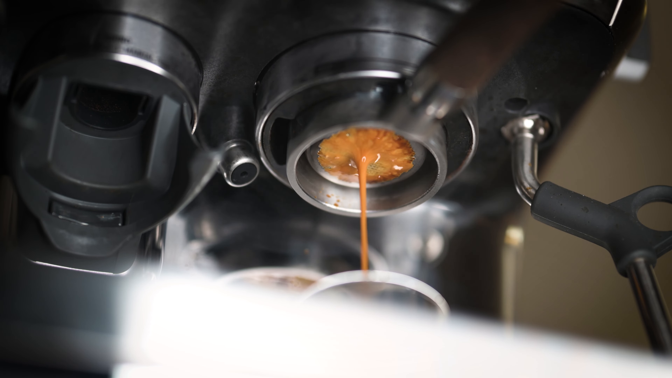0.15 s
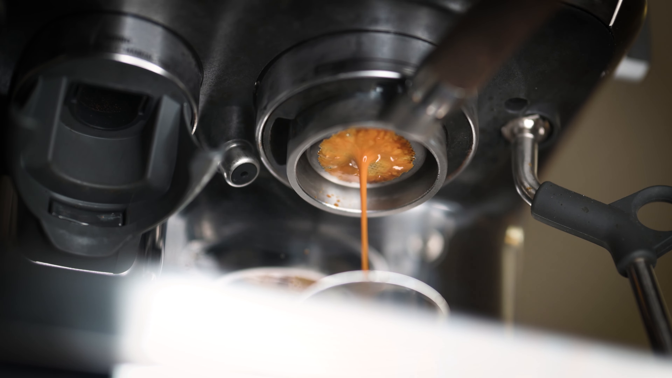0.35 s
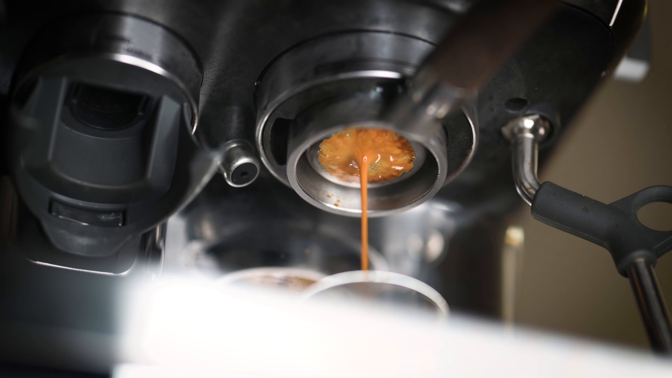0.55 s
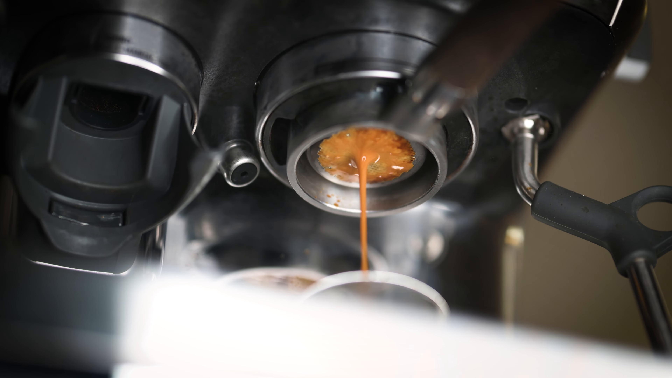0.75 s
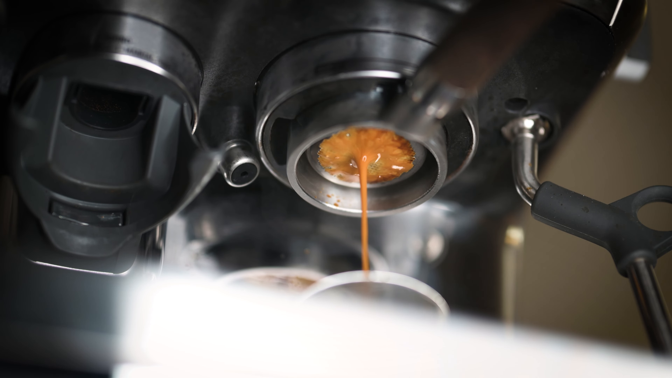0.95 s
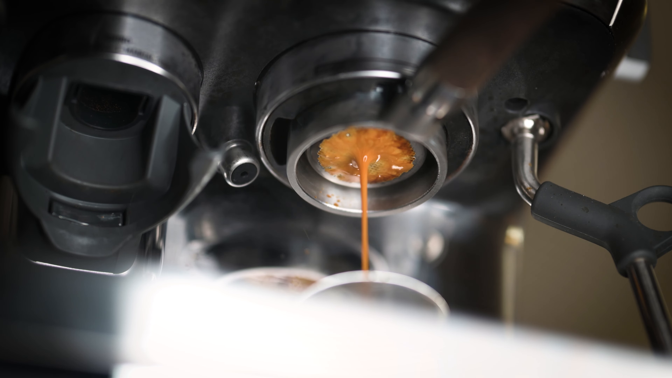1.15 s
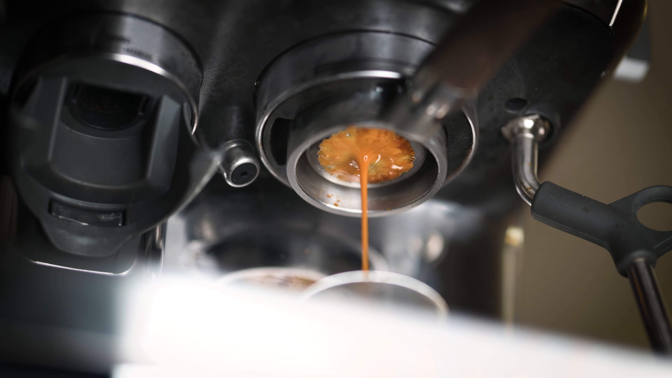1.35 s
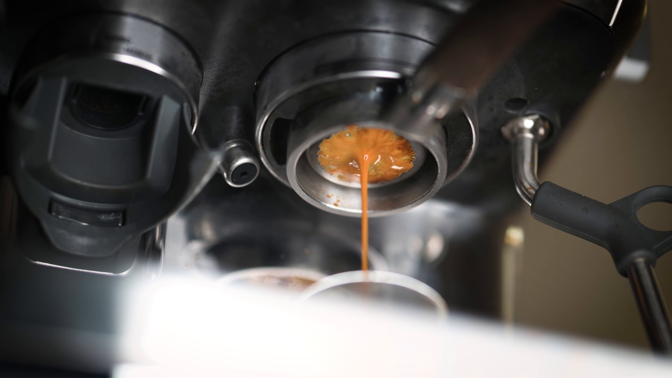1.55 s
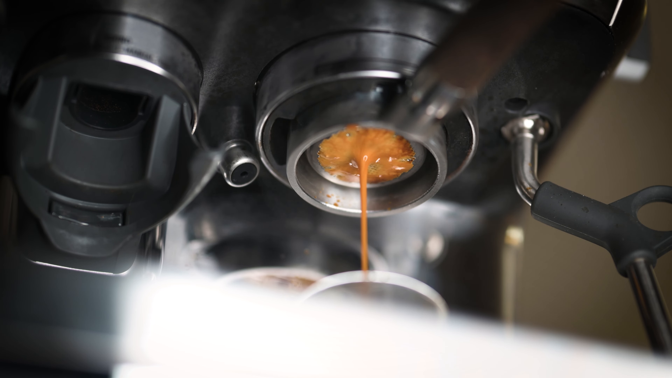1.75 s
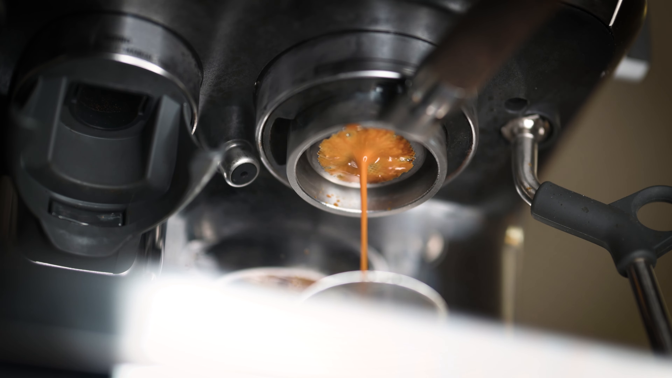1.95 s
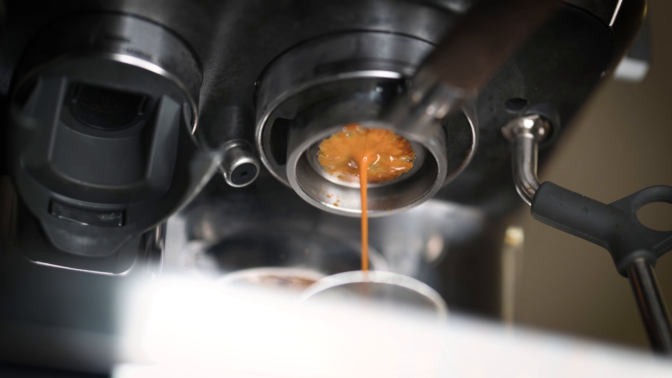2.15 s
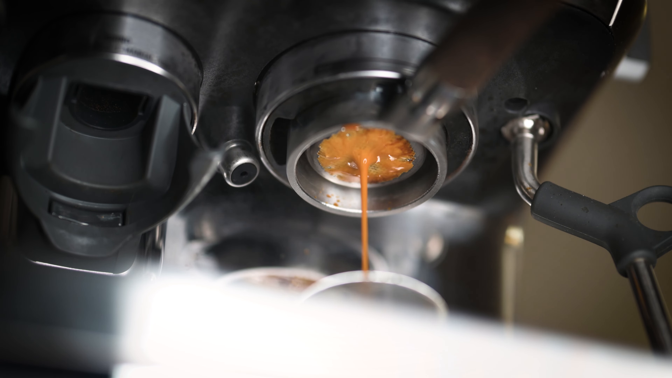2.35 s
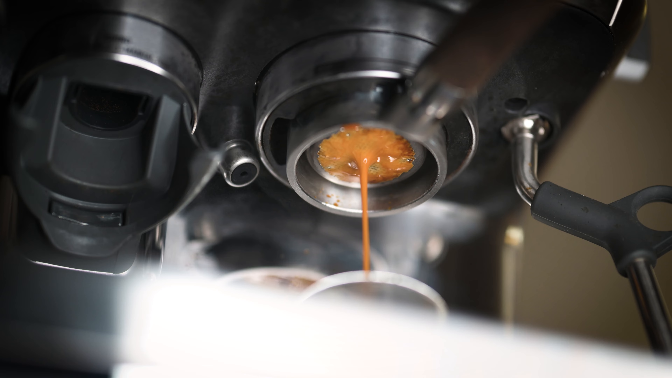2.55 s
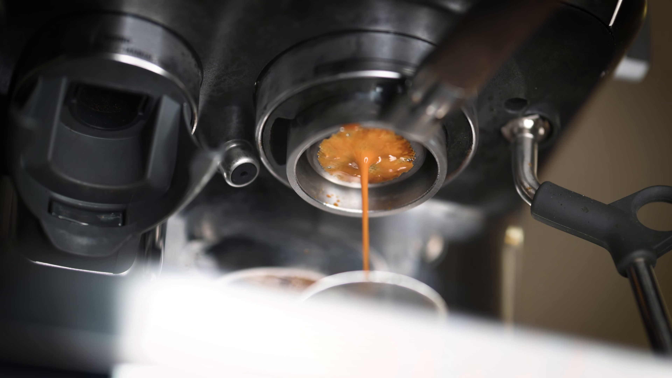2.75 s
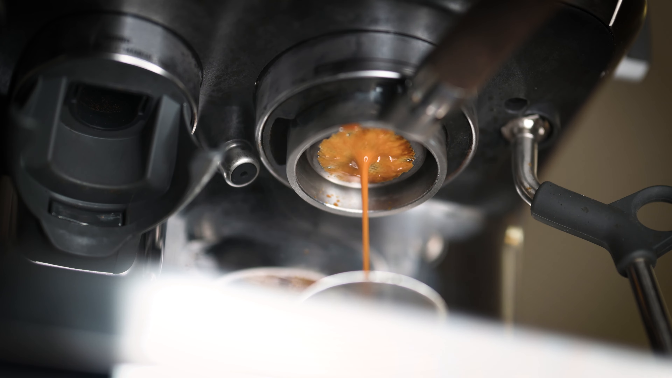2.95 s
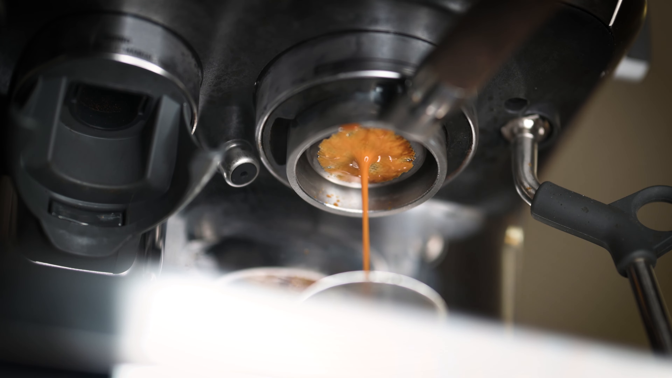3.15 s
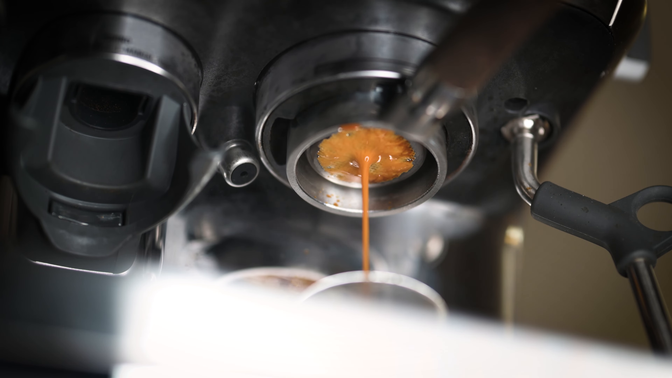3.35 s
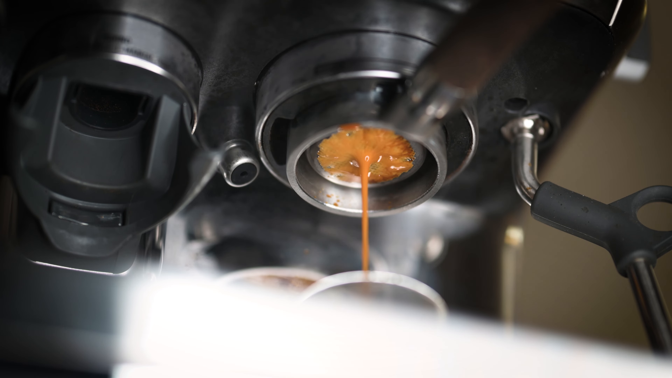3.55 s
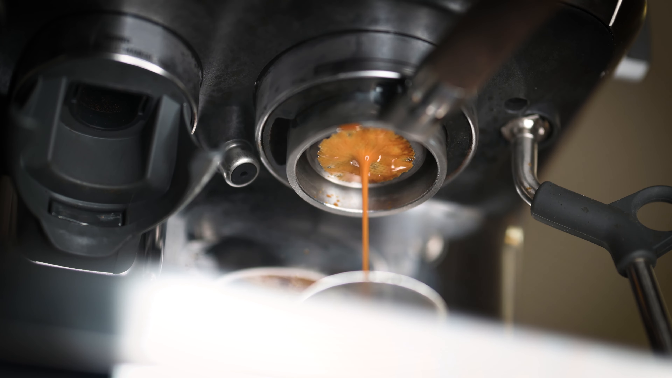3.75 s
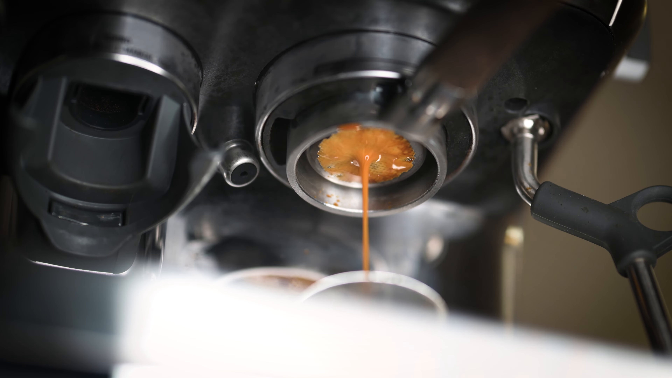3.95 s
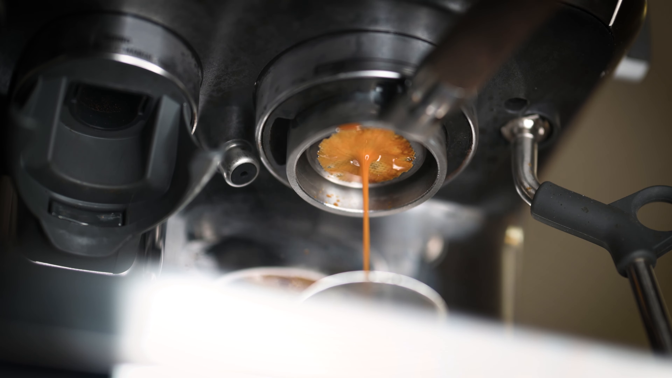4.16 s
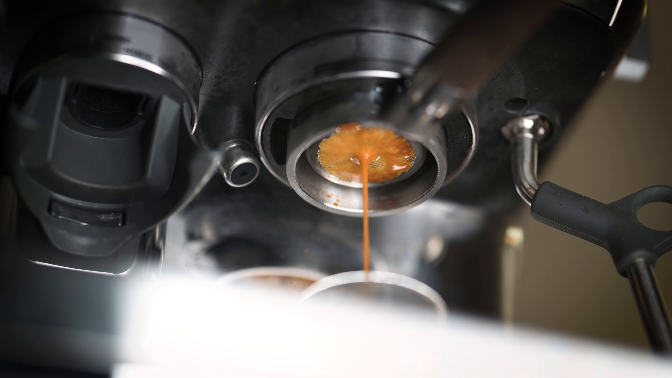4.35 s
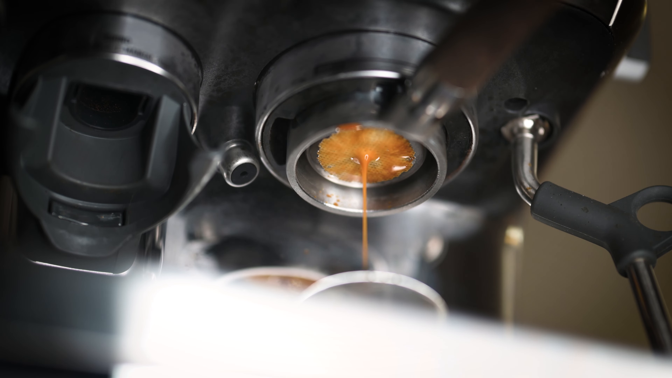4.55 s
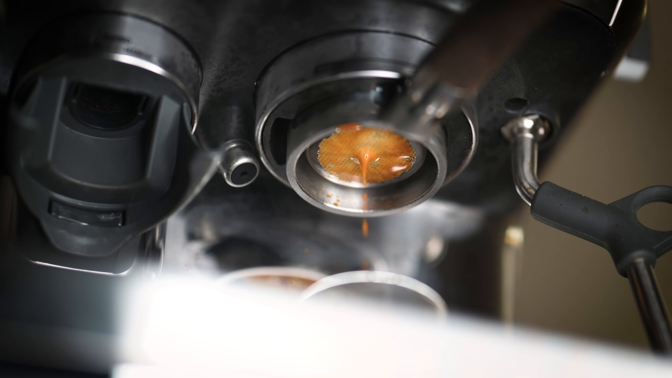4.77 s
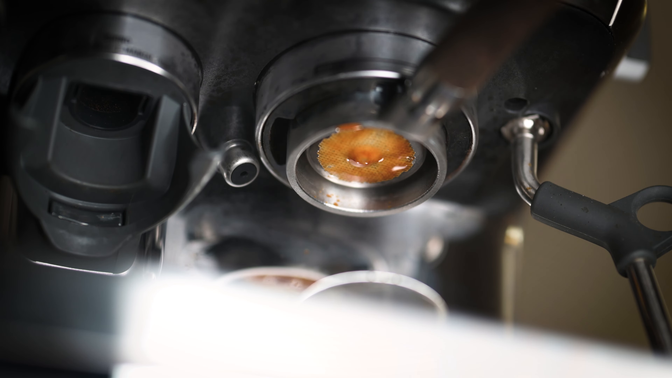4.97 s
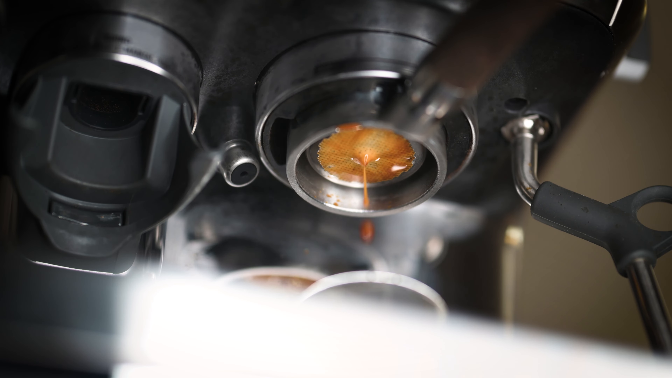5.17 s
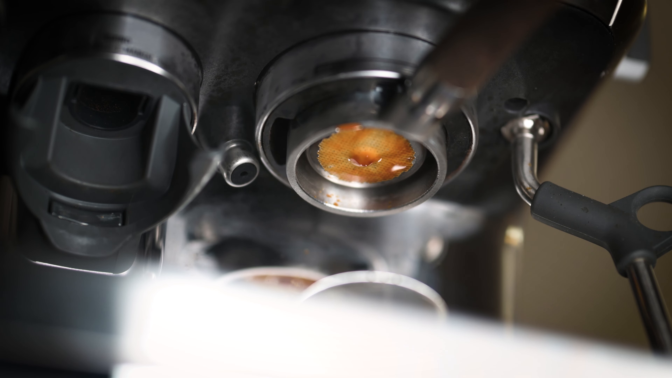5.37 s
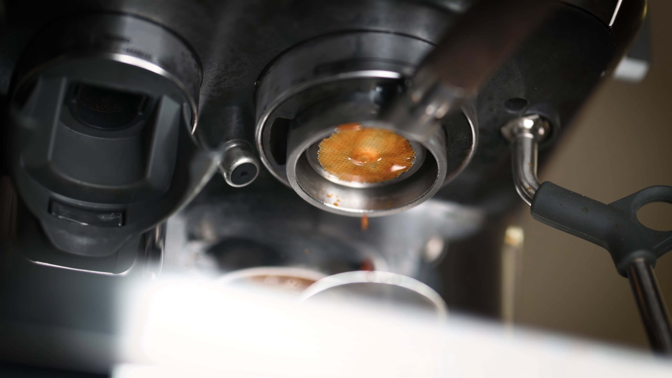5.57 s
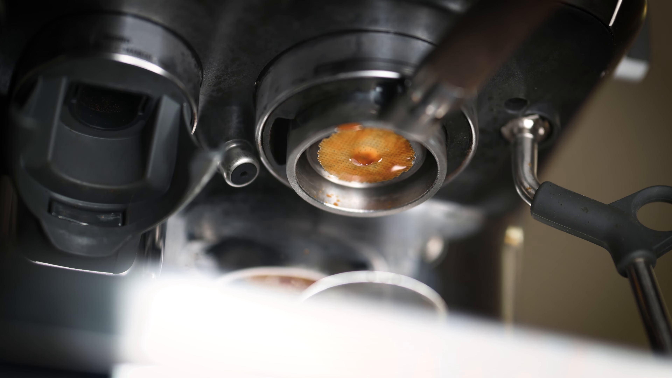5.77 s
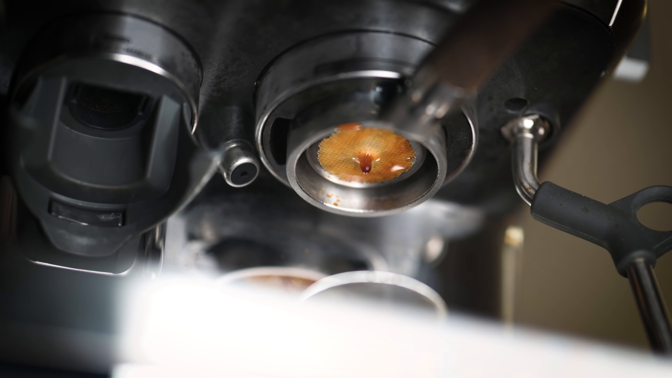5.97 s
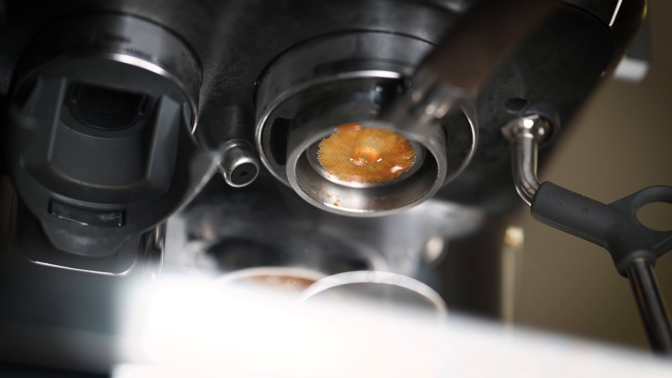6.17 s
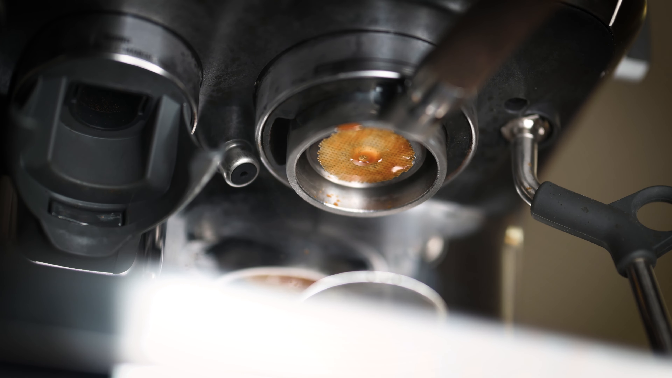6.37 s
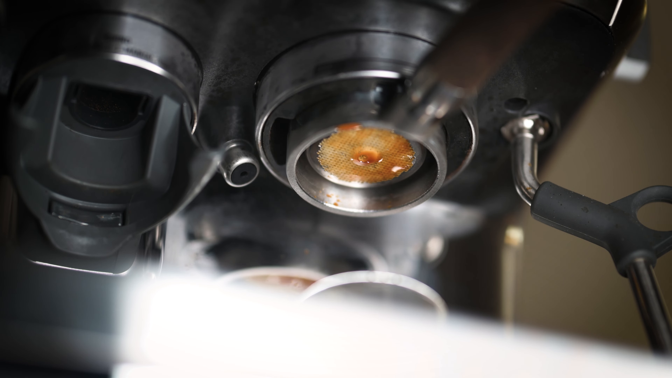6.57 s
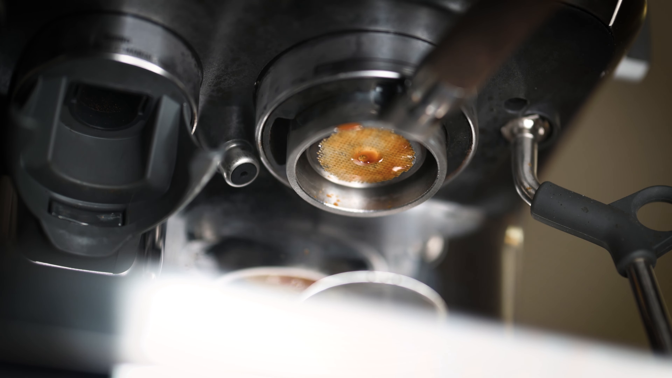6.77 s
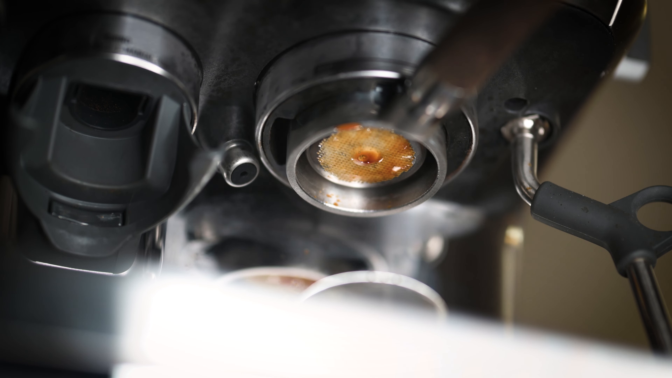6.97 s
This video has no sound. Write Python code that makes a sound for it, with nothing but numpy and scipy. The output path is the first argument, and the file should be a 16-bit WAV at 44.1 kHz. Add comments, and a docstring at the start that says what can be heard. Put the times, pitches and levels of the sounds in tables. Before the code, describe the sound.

An espresso machine pump is already running nearby, a steady electric buzz with a thin casing rattle and a soft hiss of water. Small hollow pops sound irregularly in the hot pipes. At about 2.4 seconds the buzz shifts slightly in tone, and at 3.3 seconds it cuts off with a brief shudder. For the next second the pipes give a quick scatter of light pops and ticks. At about 4.3 seconds comes the loudest sound, a sharp clack and thud as a drawer leaves its catch. It rolls along its runners with a soft rumble, light metal scrapes and little knocks, swelling slightly after 5 seconds, then knocks against its stop at 6.3 seconds. A few faint clicks follow until about 7 seconds. The pops and knocks carry the short reverberation of a small kitchen, and a low electrical hum lies under everything.

```python
"""Espresso machine and drawer

A vibratory pump, driven at the mains frequency, buzzes, rattles its casing and stops. Steam bubbles
collapse in the hot pipework, exciting its modes as pops and ticks over a steady hum. With a sharp clack
a drawer comes off its catch, rolls along its runners and knocks against the stop.
The pops and the drawer reverberate in a small kitchen."""
import sys
import numpy as np
from scipy import signal
from scipy.fft import rfft, irfft, next_fast_len
from scipy.io import wavfile
from scipy.ndimage import uniform_filter1d, map_coordinates

SR = 44100
rng = np.random.default_rng(int(sys.argv[2]) if len(sys.argv) > 2 else 0)


def file_out(sig):
    """Save sig as 16-bit WAV at sys.argv[1]."""
    # one column per channel
    cols = np.atleast_2d(sig).T
    # limit, then scale
    lim = np.clip(cols, -1, 1)
    pcm = np.round(lim * 32767).astype(np.int16)
    wavfile.write(sys.argv[1], SR, pcm)


N = 309582
TIME = np.arange(N) / SR
MAINS_HZ, PUMP_STOP_S = 59.99, 3.283
MID_ONLY = [[1], [0]]  # signals have two rows: mid and side


def amp(db):
    """Amplitude ratio of a level in decibels."""
    return 10 ** (np.asarray(db) / 20)


def unit(x):
    """Normalisation to rms 1."""
    return x / np.sqrt(np.mean(x ** 2) + 1e-20)


def along(points, hz):
    """Interpolation of (frequency, value) points on a logarithmic frequency axis."""
    frequencies, values = np.transpose(points)
    return np.interp(np.log(hz + 1), np.log(frequencies + 1), values)


def noise():
    """Uncorrelated white noise in mid and side."""
    return rng.standard_normal((2, N))


def wobble(rate_hz):
    """Smooth random modulation: a spline through Gaussian values drawn at rate_hz."""
    knots = rng.standard_normal(int(N * rate_hz / SR) + 4)
    return map_coordinates(knots, [TIME * rate_hz])


def filtered(x, response):
    """Linear filtering: the spectrum is multiplied by a frequency response."""
    size = next_fast_len(N + 8192)
    return irfft(rfft(x, size) * response(np.fft.rfftfreq(size, 1 / SR)), size)[..., :N]


def coloured(x, spectrum):
    """Spectral shaping, normalised to rms 1."""
    return unit(filtered(x, lambda hz: amp(along(spectrum, hz))))


def through_body(x, spectrum, size=4096):
    """Convolution with a body's minimum-phase impulse response, of unit energy."""
    level_db = along(spectrum, np.fft.rfftfreq(size, 1 / SR))
    cepstrum = irfft(level_db * np.log(10) / 20)
    cepstrum[1:size // 2] *= 2  # folding the cepstrum makes the response causal
    cepstrum[size // 2 + 1:] = 0
    ring = irfft(np.exp(rfft(cepstrum)))
    return signal.fftconvolve(x, ring[None] / np.linalg.norm(ring), axes=1)[:, :N]


def add(track, start_s, sound):
    """Superposition of a sound on a track."""
    part = track[:, max(round(start_s * SR), 0):][:, :sound.shape[1]]
    part += sound[:, :part.shape[1]]


def burst(t60_s):
    """Exponential decay of noise: a dying chatter of micro-contacts."""
    t = np.arange(SR // 3) / SR
    return rng.standard_normal((2, len(t))) * amp(-60 * t / t60_s)


def contact(t60_s, impulse_share):
    """Impact excitation: energy is divided between one impulse and the chatter after it."""
    chatter = burst(t60_s)
    sound = np.sqrt(1 - impulse_share) * chatter
    sound[0, 0] += np.sqrt(impulse_share) * np.linalg.norm(chatter[0])
    return sound


# Tones of the electrical hum: pitch_hz, rms_level_db
HUM_TONES = [(58.6, -62.5), (119.99, -45), (382, -71.5), (613.7, -73.5), (1712, -76), (7607, -89),
             (10150, -86)]
# Spectrum of the still air: frequency_hz, relative_level_db
AIR_SPECTRUM = [(20, -17), (55, 5.5), (100, -1), (200, -3.5), (380, -6.5), (800, -14), (1700, -16.5),
                (3500, -23.5), (8000, -32.5), (15000, -35)]
def background():
    """Stationary noise floor: mains hum, a narrow-band electronic whistle and broadband air."""
    tones = sum(np.sqrt(2) * amp(db) * np.sin(2 * np.pi * hz * TIME) for hz, db in HUM_TONES)
    whistle = unit(filtered(noise(), lambda hz: 1 / (1 + ((hz - 15200) / 110) ** 2)))
    hum = tones * amp(0.15 * wobble(4)) * MID_ONLY
    return hum + amp(-77) * whistle + amp(-55.5) * coloured(noise(), AIR_SPECTRUM)


# Reverberation time of the kitchen: frequency_hz, t60_s
KITCHEN_DECAY = [(150, 0.1), (600, 0.45), (3000, 0.4), (4500, 0.42), (7000, 0.25), (14000, 0.35)]
def kitchen(x):
    """Diffuse reverberation: each frequency decays exponentially at its own rate."""
    hz, t, bands = signal.stft(rng.standard_normal((2, SR * 2 // 3)), SR, nperseg=256)
    decay = amp(-60 * t / along(KITCHEN_DECAY, hz)[:, None])
    tail = signal.istft(bands * decay, SR, nperseg=256)[1]
    tail = np.pad(tail, ((0, 0), (SR // 200, 0)))  # 5 ms pre-delay
    return signal.fftconvolve(x, tail / np.linalg.norm(tail[0]), axes=1)[:, :N]


# Modes of the pipework: pitch_hz, relative_level_db, t60_s
PIPE_MODES = [(582, -4.5, 0.11), (1190, 5.5, 0.024), (1347, -7, 0.097), (1840, -7, 0.059),
              (2030, -5.5, 0.21), (2152, -4.5, 0.13), (2343, 5.5, 0.021), (2603, -0.5, 0.031)]
def pop(level_db, snap_db, snap_hz):
    """Bubble collapse: a dry snap excites pipe modes, which flutter as echoes run along the pipe."""
    t = np.arange(SR // 6) / SR
    hz, mode_db, t60_s = np.transpose(PIPE_MODES)[:, :, None]
    echo_phasors = rng.standard_normal((2, len(PIPE_MODES), 20, 2)) @ [1, 1j]
    flutter = signal.resample(echo_phasors, len(t), axis=2)
    modes = np.real(flutter * np.exp(2j * np.pi * hz * t))
    ring = np.sum(amp(mode_db - 60 * t / t60_s) * modes, axis=1)
    attack = 1 - np.exp(-t / 0.0005)
    collapse = contact(t60_s=0.017, impulse_share=1 / 5)[:, :len(t)]
    snap = signal.lfilter(*signal.iirpeak(min(snap_hz, SR / 3), Q=0.9, fs=SR), collapse)
    return amp(level_db) * (amp(-15) * ring * attack + amp(snap_db + 5) * snap)


# Distinct bubble collapses: start_s, relative_level_db, snap_emphasis_db
STEAM_POPS = [(0.0243, -24, -19), (0.167, -43, 3), (0.637, -25.5, -19), (0.831, -26, -24),
              (1.1026, -29, -16), (1.3818, -30.5, -20), (1.9644, -32, -21), (2.3478, -35, -7),
              (2.9742, -36, -7), (3.3787, -31.5, -18.5), (3.477, -37.5, -8), (3.5319, -37, -9),
              (3.6026, -37, -10), (3.6388, -32.5, -17), (3.7773, -41, -20), (3.7924, -32, -13),
              (3.8762, -36.5, -17), (3.9384, -39.5, -15.5), (3.977, -33.5, -5.5), (4.0248, -37.5, -6),
              (4.2108, -30.5, -18)]
def pipework(simmer_s=0.8, simmer_count=22):
    """Transients of collapsing steam: distinct pops, and a faint simmer after the pump stops."""
    out = np.zeros((2, N))
    for start_s, level_db, snap_db in STEAM_POPS:
        snap_hz = 3900 * np.exp(0.11 * rng.standard_normal())
        add(out, start_s, pop(level_db, snap_db, snap_hz))
    for k, (jitter, faintness, pitch) in enumerate(rng.random((simmer_count, 3))):
        start_s = PUMP_STOP_S + simmer_s * (k + jitter) / simmer_count
        add(out, start_s, pop(level_db=-38.5 - 4 * faintness, snap_db=-13.5, snap_hz=3000 + 2500 * pitch))
    return out


def wheel_grain(depth_db, size=512):
    """Uneven excitation by the wheels: noise swells briefly, now at one pitch, now at another."""
    bands = signal.stft(noise(), nperseg=size)[2]
    swells = uniform_filter1d(rng.standard_normal(bands.shape[1:]), size=6, axis=0)  # across frequency
    swells = uniform_filter1d(swells, size=5, axis=1)  # across time
    return signal.istft(bands * amp(depth_db * unit(swells)), nperseg=size)[1][:, :N]


# Spectra of the runners under rolling and under friction: frequency_hz, relative_level_db
ROLLING_SPECTRUM = [(100, -34), (170, -18), (243, 0.5), (278, -10), (380, 1), (469, -6.5), (595, -5.5),
                    (1030, -11.5), (1590, -7), (1850, -11), (2980, -12), (3670, -27), (4130, -11.5),
                    (4450, -36), (6000, -53), (7800, -62), (13200, -120)]
FRICTION_SPECTRUM = [(2060, -50), (3500, 1), (5440, -2.5), (7140, -9.5), (7900, -6), (8620, -12),
                     (15800, -22)]
def runners(start_s=4.36, end_s=6.29, edge_s=0.013, pull_s=5.11, pull_rise_s=0.34):
    """Rolling and friction noise: both fade as the drawer coasts; a second pull lifts the rumble."""
    age = TIME - start_s
    moving = np.clip(age / edge_s, 0, 1) * np.clip((end_s - TIME) / edge_s, 0, 1)
    pulled = np.clip((TIME - pull_s) / pull_rise_s, 0, 1)
    rumble_db = -52.5 + 8.5 * pulled - 4 * age - 0.1 * wobble(13)
    hiss_db = -57.5 - 7.5 * age + 3.5 * wobble(22)
    rumble = coloured(wheel_grain(depth_db=3.2) * amp(1.56 * wobble(120)), ROLLING_SPECTRUM)
    hiss = coloured(noise() * amp(3.1 * wobble(200)), FRICTION_SPECTRUM)
    return moving * (amp(rumble_db) * rumble + amp(hiss_db) * hiss)


# Light scrapes of metal: start_s, level_db, t60_s
METAL_SCRAPES = [(4.295, -28, 0.13), (4.326, -39, 0.27), (4.475, -47, 0.068), (4.635, -57, .06),
                 (4.55, -52, 0.1), (4.73, -64, 0.21), (4.8998, -44, 0.065), (5.211, -42.5, 0.046),
                 (5.237, -49, 0.26)]
def scrapes():
    """Sliding friction: short noise bursts filtered by the runners."""
    friction = np.zeros((2, N))
    for start_s, level_db, t60_s in METAL_SCRAPES:
        add(friction, start_s, amp(level_db) * burst(t60_s))
    return through_body(friction, FRICTION_SPECTRUM)


def thud(start_s=4.264, pitch_hz=391, level_db=-13, t60_s=0.061):
    """Damped oscillation: the drawer's front rings, slightly roughly, as it comes free."""
    phase = 2 * np.pi * pitch_hz * TIME + wobble(70) / 2
    envelope = amp(level_db - 60 * TIME / t60_s) * (1 - np.exp(-TIME / 0.0042))
    out = np.zeros((2, N))
    add(out, start_s, envelope * np.sin(phase) * MID_ONLY)
    return out


# Resonances of the hard catch: pitch_hz, bandwidth_hz, relative_level_db
CATCH_MODES = [(1664, 170, -1.5), (2846, 365, -1.5), (4323, 640, -19), (6000, 350, -18.5), (7000, 620, -31),
               (9300, 1800, -26.5), (13900, 6100, -28)]
def catch_response(hz):
    """Modal superposition: the catch responds as a sum of second-order resonators."""
    return sum(amp(db) * 1j * hz * width / (centre ** 2 - hz ** 2 + 1j * hz * width)
               for centre, width, db in CATCH_MODES)


# Impacts of the drawer: start_s, crack_drive_db, knock_drive_db, t60_s
DRAWER_IMPACTS = [(4.2547, -11, -23.5, 0.028), (4.257, -28, -23.5, 0.056), (4.2765, -47, -19.5, 0.052),
                  (4.2894, -25, -28.5, 0.14), (4.4587, -42, -43, 0.16), (4.5379, -46, -43, 0.36),
                  (4.62, -36.5, -52, 0.044), (4.8, -47, -44.5, 0.07), (5.376, -66, -45, 0.14),
                  (5.6935, -44.5, -56, 0.13), (5.733, -48, -45, 0.08), (6.2743, -31.5, -26, 0.046),
                  (6.323, -51, -42, 0.23), (6.68, -61, -60.5, .1), (6.755, -53, -55, 0.03),
                  (6.8132, -55, -53, 0.029), (6.9868, -57, -59, .04)]
# Response of its dull body: frequency_hz, relative_level_db
BODY_SPECTRUM = [(70, -78), (130, -2), (230, 1), (350, 5), (470, 4.5), (620, 8.5), (820, -9.5), (1130, 2.5),
                 (1380, 1.5), (1600, -5), (1950, 5), (2750, -23.5), (3800, -3), (5000, -59), (15000, -34)]
def drawer():
    """Impact and resonance: cracks of the catch and knocks of the body, amid scraping and rolling."""
    cracks, knocks = np.zeros((2, 2, N))
    for start_s, crack_db, knock_db, t60_s in DRAWER_IMPACTS:
        cutoff_hz = min(3600 * amp(2 * max(crack_db + 26, 0)), SR / 2.5)  # harder blows are brighter
        crack = signal.lfilter(*signal.butter(2, cutoff_hz, fs=SR), contact(t60_s, impulse_share=1 / 8))
        add(cracks, start_s, amp(crack_db) * crack)
        add(knocks, start_s, amp(knock_db) * contact(t60_s, impulse_share=1 / 6))
    catch = amp(16) * filtered(cracks, catch_response)
    return catch + through_body(knocks, BODY_SPECTRUM) + scrapes() + runners() + thud()


# Air passing the valve: centre_s, half_width_s, flow_change_db, panel_change_db
AIR_SURGES = [(0.294, 0.026, 2.5, -2), (0.542, 0.048, 1, -1.8), (0.634, 0.045, 5, 2), (0.71, 0.037, 0, -2),
              (2.447, 0.12, 2.5, 0)]
def surges():
    """Load modulation: passing air gives the flow noise and panel drone Gaussian bumps in level."""
    centre_s, half_width_s, flow_db, panel_db = np.transpose(AIR_SURGES)
    bumps = np.exp(-((TIME[:, None] - centre_s) / half_width_s) ** 2)
    return bumps @ flow_db, bumps @ panel_db


# Spectra of the rushing water and of the final shudder: frequency_hz, relative_level_db
FLOW_SPECTRUM = [(120, -12), (250, -3.5), (620, 11), (850, -7), (1200, 2), (1550, -9.5), (2150, -2.5),
                 (3200, -9.5), (8000, -23.5)]
SHUDDER_SPECTRUM = [(100, -11), (260, -6), (620, -3), (850, -18), (1150, -8), (3000, -37.5)]
def water(running, surge_db):
    """Flow noise of water forced through the valve, and a decaying shudder when the piston stops."""
    flow = amp(-46.5 + surge_db + 1.4 * wobble(9)) * running * coloured(noise(), FLOW_SPECTRUM)
    shudder = np.zeros((2, N))
    add(shudder, PUMP_STOP_S, amp(-41) * burst(t60_s=0.64))
    return flow + through_body(shudder, SHUDDER_SPECTRUM)


def stroke_envelope(strike_s, rise_s, fall_s, floor):
    """Periodic amplitude modulation: a swell follows every piston stroke, at rms 1."""
    age = (TIME - strike_s) % (1 / MAINS_HZ)
    return unit(floor + (1 - np.exp(-age / rise_s)) * np.exp(-age / fall_s))


# Spectrum of the spray: frequency_hz, relative_level_db
SPRAY_SPECTRUM = [(2500, -33), (6000, 6), (9800, 6), (12500, 1), (15200, -7)]
def valve_spray():
    """Pulsating flow: each stroke sends a hissing spurt through the valve."""
    spurts = stroke_envelope(strike_s=0.002, rise_s=0.00081, fall_s=0.0056, floor=0.076)
    return amp(1.5 * wobble(7.6)) * spurts * coloured(noise(), SPRAY_SPECTRUM)


# Spectrum of the rattling casing: frequency_hz, relative_level_db
RATTLE_SPECTRUM = [(850, 0.5), (1450, 3), (1520, -1), (1680, -6), (1850, -3.5), (2100, -7), (2350, -4.5),
                   (2650, 2.5), (3200, -15), (3850, -6.5), (4150, -8.5), (4450, -1.5), (4950, -8),
                   (5500, -5.5), (5900, -8), (7700, -34.5), (9400, -15.5), (14000, -31)]
def casing_rattle(drift=0.45, looseness=0.38):
    """Quasi-periodic contact: nearly the same chatter recurs each cycle, its pattern slowly drifting."""
    period = round(SR / MAINS_HZ)
    blend_a, blend_b = drift * wobble(1.28), drift * wobble(1.54)
    base, cycle_a, cycle_b = np.tile(rng.standard_normal((3, 2, period)), N // period + 1)[..., :N]
    pattern = (base + blend_a * cycle_a + blend_b * cycle_b) / np.sqrt(1 + blend_a ** 2 + blend_b ** 2)
    chatter = pattern + looseness * noise()
    strokes = stroke_envelope(strike_s=0.001, rise_s=0.001, fall_s=0.0013, floor=0.11)
    return coloured(chatter * strokes * amp(0.67 * wobble(40.4)), RATTLE_SPECTRUM)


# Thin metal parts, before and after the casing shifts on its seat: nominal_pitch_hz, rms_level_db
RING_BEFORE_SHIFT = [(1437, -62.5), (1680, -59), (2099, -58.5), (2579, -58), (3838, -79.5), (4500, -102),
                     (4920, -61)]
RING_AFTER_SHIFT = [(1319, -60), (1680, -65), (2099, -62.5), (2579, -62), (2880, -77), (3779, -64.5),
                    (4500, -74), (4920, -64), (5879, -71)]
def casing_ring(shifted):
    """Forced vibration: each thin metal part rings at the nearest harmonic of the stroke."""
    out = np.zeros((2, N))
    for tones, weight, waver_db in (RING_BEFORE_SHIFT, 1 - shifted, 0), (RING_AFTER_SHIFT, shifted, 4):
        for nominal_hz, level_db in tones:
            harmonic_hz = round(nominal_hz / MAINS_HZ) * MAINS_HZ
            phase = 2 * np.pi * (harmonic_hz * TIME + rng.random((2, 1)))
            out += weight * np.sqrt(2) * amp(level_db + waver_db * wobble(2.85)) * np.sin(phase)
    return out


# Harmonics of the piston stroke: harmonic_number, relative_level_db
STROKE_HARMONICS = [(1, -8.5), (2, -8.5), (3, -16.5), (4, -4.5), (5, -4), (6, -11.5), (7, -0.5), (8, -7),
                    (9, -13), (10, 4.5), (11, 4), (12, -15.5), (13, -15.5), (14, -13.5), (15, -29),
                    (16, -11.5), (17, -29.5), (18, -37), (19, -5.5), (20, -14), (21, -24), (22, -42),
                    (23, -57), (24, -30)]
def piston_drone(part_gains, waver_db=0.38, scatter_turns=0.04, side_db=-8):
    """Harmonic series of a periodic force: piston, frame, panel and tray each radiate their own range."""
    number, level_db = np.transpose(STROKE_HARMONICS)
    size = amp(level_db)
    # dispersion: the frame passes higher harmonics later, spreading each stroke over its whole cycle
    lag = np.cumsum(size ** 2) / np.sum(size ** 2)
    scatter = scatter_turns * rng.standard_normal((2, len(number))) * [[1], [10]]  # tenfold in the side
    turns = lag - np.cumsum(lag) + scatter
    radiator = np.digitize(number, [1.5, 8.5, 13.5])
    out = np.zeros((2, N))
    for part, gain in enumerate(part_gains):
        own = np.flatnonzero((radiator == part) & (number != 2))  # the hum supplies harmonic 2
        for i in own:
            tone = np.sqrt(2) * np.cos(2 * np.pi * (number[i] * MAINS_HZ * TIME + turns[:, i, None]))
            share = size[i] / np.linalg.norm(size[own])
            out += gain * share * amp(waver_db * wobble(7.52)) * tone
    return out * amp([[0], [side_db]])


def part_gain(shifted, start_db, drift_db_per_s, shifted_db, t60_s):
    """Drive and free decay: a level drifts as pressure builds, holds after the shift, then dies away."""
    building_db = start_db + drift_db_per_s * TIME
    running_db = building_db + shifted * (shifted_db - building_db)
    return amp(running_db - 60 * np.maximum(TIME - PUMP_STOP_S, 0) / t60_s)


# Gains of piston, frame, panel, tray, rattle and spray: start_db, drift_db_per_s, shifted_db, t60_s
PUMP_PARTS = [(-47, -0.5, -46.5, 0.25), (-32.5, -1.02, -33, 0.28), (-29.5, -2.5, -33, 0.071),
              (-45, 0.75, -43, 0.27), (-49.5, 0.37, -49, 0.068), (-59.5, -1, -59, 0.1)]
def pump(shift_s=2.38, shift_takes_s=0.084):
    """Forced vibration at the mains frequency; the timbre changes as the casing shifts on its seat."""
    shifted = np.clip((TIME - shift_s) / shift_takes_s, 0, 1)
    piston, frame, panel, tray, shaking, spraying = [part_gain(shifted, *part) for part in PUMP_PARTS]
    running = frame / frame.max()
    flow_surge_db, panel_surge_db = surges()
    coil_hz = HUM_TONES[1][0]  # twice the mains frequency
    coil = amp(-46.5) * running * np.sin(2 * np.pi * coil_hz * TIME) * MID_ONLY
    rattle = amp(4) * shaking * casing_rattle()
    spray = spraying * valve_spray()
    ring = running * casing_ring(shifted)
    drone = piston_drone([piston, frame, panel * amp(panel_surge_db), tray])
    return coil + drone + water(running, flow_surge_db) + rattle + spray + ring


# Stereo width: frequency_hz, side_gain_db
STEREO_WIDTH = [(100, -17), (500, -13), (1100, -10), (2200, -7), (4500, -1), (15000, -2)]
# Stereo balance, added on the left and subtracted on the right: frequency_hz, gain_db
LEFT_BIAS = [(250, -0.29), (600, -0.41), (2400, -0.71), (8000, 0.94)]
def scene():
    """Mid-side stereophony: the bass is central, the treble wide, its top a little to the left."""
    pops, slide = pipework(), drawer()
    direct = pump() + pops + slide
    reverberation = kitchen(amp(-2) * pops + amp(-3.5) * slide)
    mid, side = direct + reverberation + background()
    side = filtered(side, lambda hz: amp(along(STEREO_WIDTH, hz)))
    left_right = np.array([mid + side, mid - side])
    return filtered(left_right, lambda hz: amp(along(LEFT_BIAS, hz) * [[1], [-1]]))


def record(dry):
    """Band limiting: an ideal low-pass filter at 15.8 kHz."""
    return filtered(dry, lambda hz: hz < 15800)


dry = scene()
out = record(dry)
file_out(out)
```